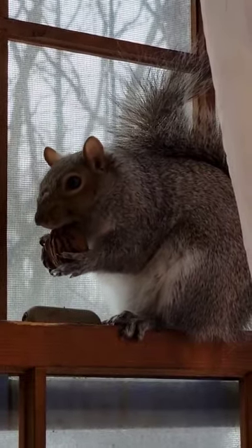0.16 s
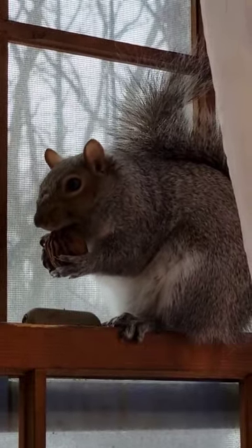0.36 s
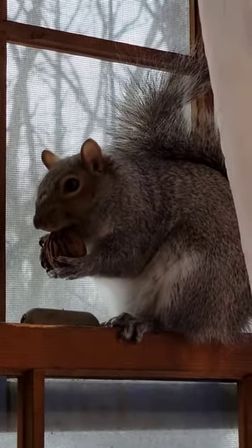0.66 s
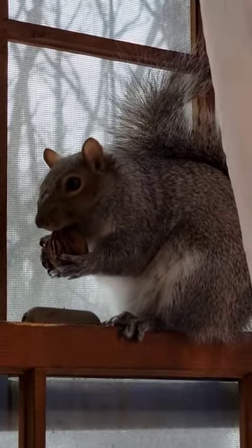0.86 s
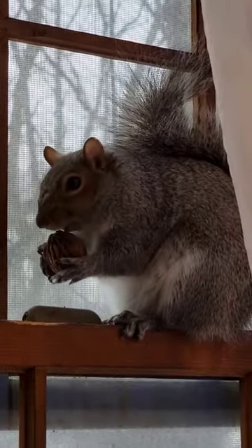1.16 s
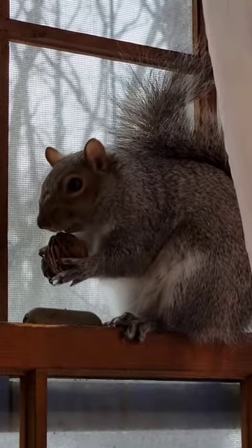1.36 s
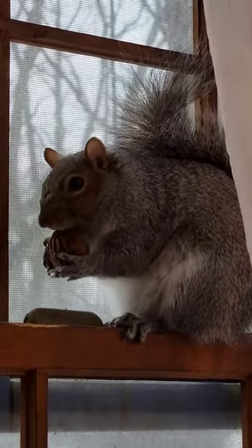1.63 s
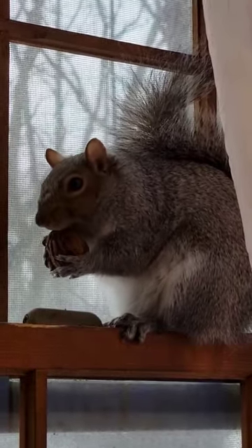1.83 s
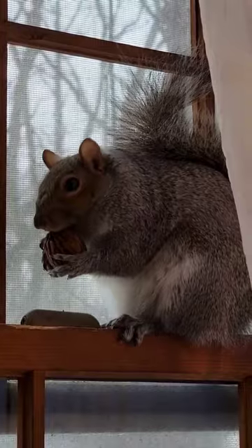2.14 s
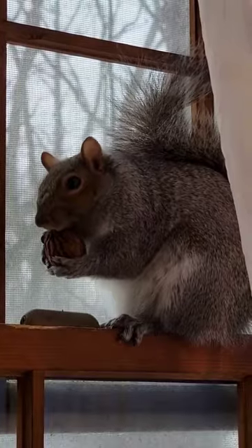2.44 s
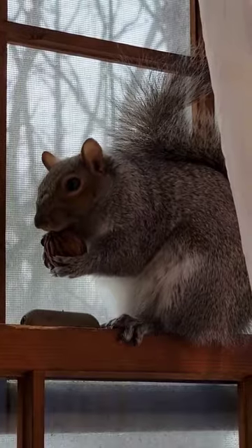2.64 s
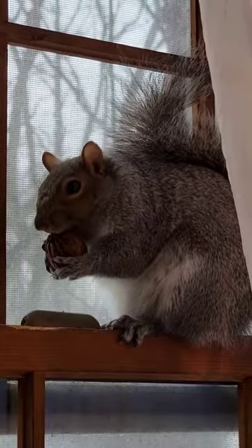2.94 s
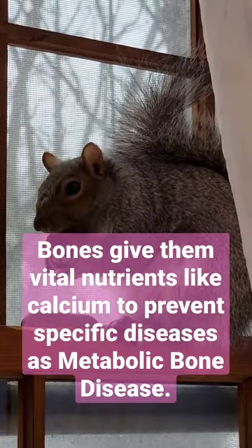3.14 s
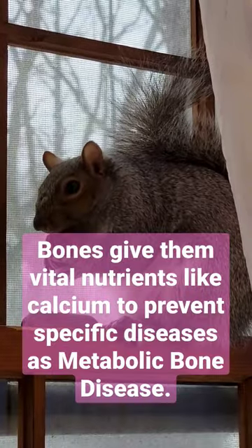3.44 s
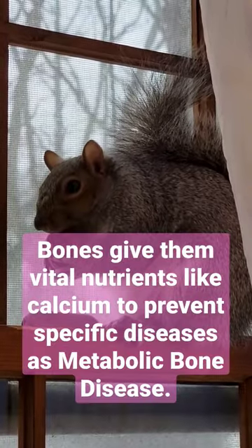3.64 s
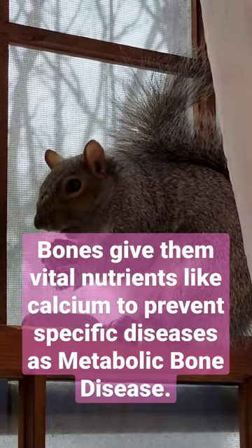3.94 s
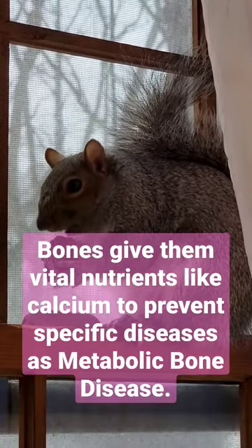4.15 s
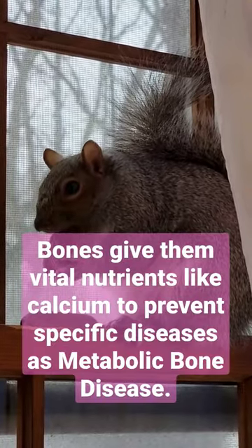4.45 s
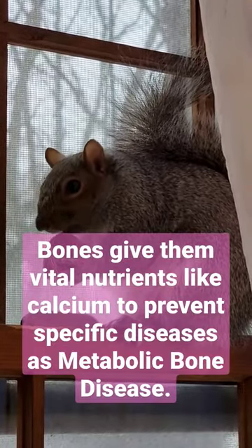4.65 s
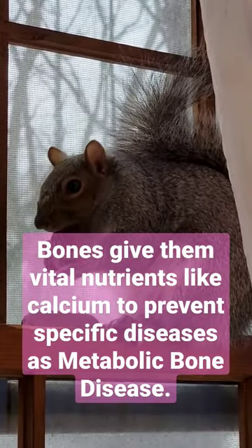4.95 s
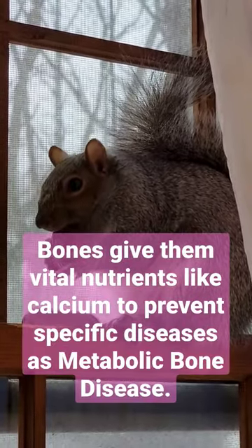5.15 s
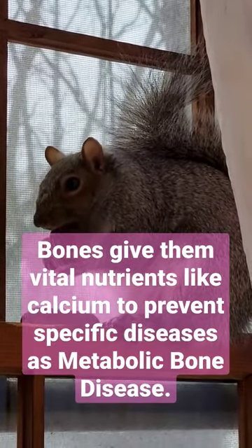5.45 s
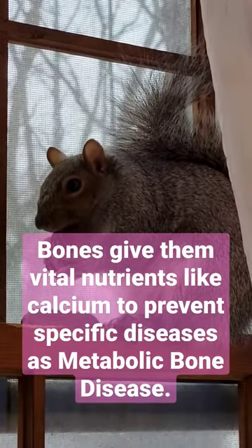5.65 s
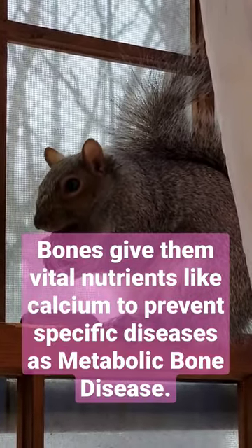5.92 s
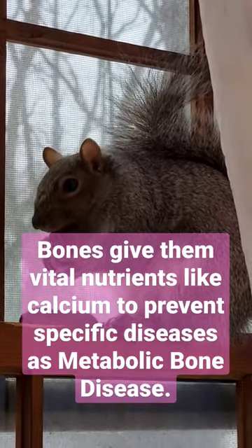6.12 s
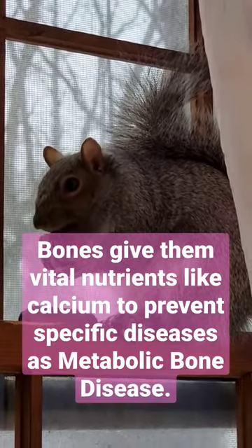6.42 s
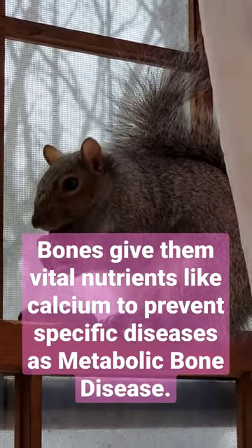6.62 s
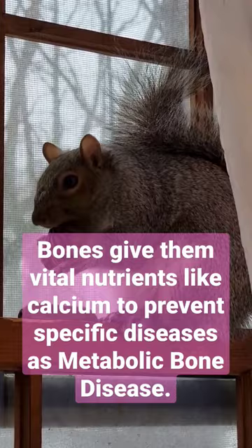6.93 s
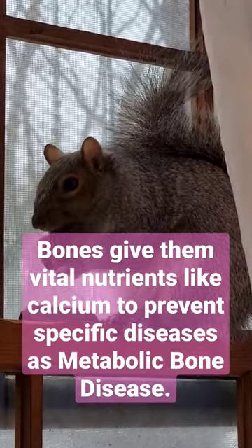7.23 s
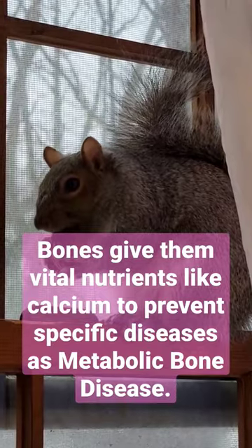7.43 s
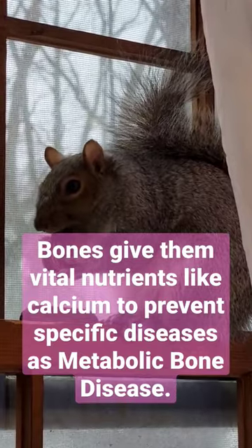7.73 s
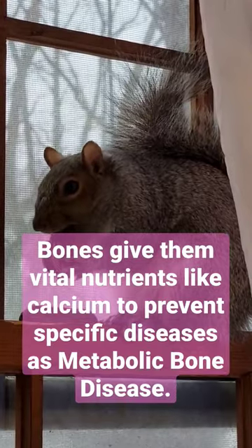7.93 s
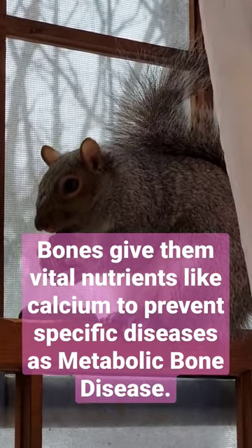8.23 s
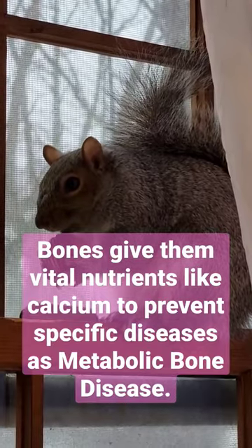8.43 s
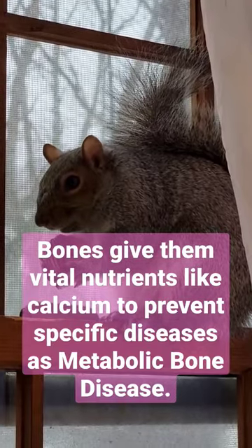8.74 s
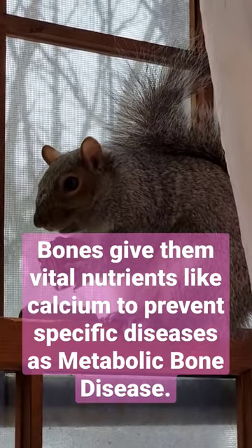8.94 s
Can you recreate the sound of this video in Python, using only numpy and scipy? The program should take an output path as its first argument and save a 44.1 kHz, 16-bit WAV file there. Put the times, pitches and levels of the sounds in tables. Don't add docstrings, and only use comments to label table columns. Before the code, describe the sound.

Tiny teeth drag over a nutshell in quick, gritty rasps, each swelling and cutting off in a fraction of a second. Quiet strokes come first, then a pause, a few isolated ticks, some hard snaps, another pause, and finally a long regular run of louder scraping. The shell rings woody and hollow with bright, scratchy edges. A close stereo microphone hears short reflections from the window corner and a soft, low house hum.

```python
import sys
import numpy as np
from scipy import signal
from scipy.fft import rfft, irfft, next_fast_len
from scipy.io import wavfile
from scipy.ndimage import uniform_filter1d

SR = 44100
rng = np.random.default_rng(int(sys.argv[2]) if len(sys.argv) > 2 else 0)


def linear_from_db(decibels):
    return 10 ** (np.asarray(decibels, float) / 20)


def wrap_up_sound(samples):
    columns = np.atleast_2d(samples).T
    tamed = np.clip(columns, -1, 1)
    steps = np.round(tamed * 32767).astype(np.int16)
    wavfile.write(sys.argv[1], SR, steps)


N = 400415


def unit(x):
    return x / np.sqrt(np.mean(x ** 2) + 1e-20)


def along(points, hz):
    f, v = np.transpose(points)
    return np.interp(np.log(hz + 1), np.log(f + 1), v)


def filtered(x, response):
    m = next_fast_len(N + SR // 2)
    return irfft(rfft(x, m) * response(np.fft.rfftfreq(m, 1 / SR)), m)[..., :N]


def resonances(modes, order=1):
    def response(f):
        total = 0
        for k, (pitch, width, db) in enumerate(modes):
            total = total + (-1) ** k * linear_from_db(db) * 1j * f * width / (pitch * pitch - f * f + 1j * f * width)
        return total ** order / np.sqrt(np.mean(abs(total) ** (2 * order)))
    return response


def leaning(points, hz):
    return linear_from_db(np.array([.5, -.5])[:, None] * along(points, hz))


# pitch_hz, likeness (-1 to 1)
HOUSE_ALIKE = [(60, 0.9), (130, 0.98), (290, 0.91), (640, 0.65), (1410, -0.15), (3100, -0.31), (6820, 0.15),
               (15000, -0.01)]
# pitch_hz, left_over_right_db
HOUSE_LEAN = [(60, 0), (110, -1.5), (200, -2), (380, -0.5), (700, -1.0), (1290, -1), (2380, -5), (4400, -8),
              (8120, 0.5), (15000, -3)]


def rush(colour, patchy_db):
    z = signal.stft(rng.standard_normal((2, N)), nperseg=512)[2]
    field = uniform_filter1d(rng.standard_normal(z.shape[1:]), size=6, axis=0)
    field = uniform_filter1d(field, size=14, axis=1)
    pair = signal.istft(z * linear_from_db(patchy_db * unit(field)), nperseg=512)[1][:, :N]

    def mid_side(hz):
        turn = np.arccos(np.clip(along(HOUSE_ALIKE, hz), -1, 1)) / 2
        return colour(hz) * np.array([np.cos(turn), np.sin(turn)])

    mid, side = filtered(pair, mid_side)
    ports = np.array([mid + side, mid - side])
    return unit(filtered(ports, lambda hz: leaning(HOUSE_LEAN, hz)))


# pitch_hz, level_db (per Hz)
HUM = [(20, -47), (32, -26), (58, -5.5), (213, -6.5), (350, -10), (390, -15.5), (800, -15), (880, -19),
       (1700, -21.5), (2750, -29.5), (4000, -28.5), (7000, -35), (7900, -42.5), (8300, -55)]
# pitch_hz, width_hz, level_db
DRONES = [(72.6, 35, 2.24), (157.3, 17, 3.4), (210.5, 16.7, 9.47), (275.5, 24.5, 5.9), (354.7, 17.4, 5.8),
          (2820, 690, 8)]
# pitch_hz, level_db (per Hz)
HISS = [(4880, -54), (8300, -9.5), (9880, -7.5), (11300, -4.5), (14600, -3.5), (15300, -7)]


def house():
    def hum_colour(hz):
        drones_db = sum(db * np.exp(-((hz - pitch) / width) ** 2) for pitch, width, db in DRONES)
        return linear_from_db(along(HUM, hz) + drones_db)

    hum = rush(hum_colour, patchy_db=1)
    hiss = rush(lambda hz: linear_from_db(along(HISS, hz)), patchy_db=0.8)
    return linear_from_db(-46) * hum + linear_from_db(-76) * hiss


# pitch_hz, t60_s
CORNER = [(1000, .13), (3000, .105), (7000, .075), (15000, .048)]


def corner(x):
    out, step = np.zeros((2, N + SR)), SR // 3
    delay = 60
    for start in range(0, N, step):
        hz, t, z = signal.stft(rng.standard_normal((2, SR // 4)), SR, nperseg=128)
        decay = linear_from_db(-60 * t / along(CORNER, hz)[:, None])
        tail = signal.istft(z * decay, SR, nperseg=128)[1]
        tail = tail / np.linalg.norm(tail[0])
        wet = signal.fftconvolve(x[None, start:start + step], tail, axes=1)
        out[:, start + delay:start + delay + wet.shape[1]] += wet
    return out[:, :N]


# full_bite_s, rise_s, hold_s,
# pressure_db, brightness_db
STROKES = [(0.071, 0.018, .002, -40.5, -3.5), (0.225, .02, .01, -38.5, -1), (0.392, 0.036, .005, -41, -8),
           (0.562, 0.028, 0.033, -39.5, -10.5), (0.789, 0.024, .002, -43, -3),
           (0.936, 0.029, .002, -39.5, -3.5), (1.117, 0.02, 0.0017, -42, -8), (2.047, .003, .012, -59, 7),
           (2.267, .01, .005, -59, -30), (2.519, 0.014, 0.0026, -46, 3), (2.668, 0.0026, 0.0093, -48, 1.5),
           (2.822, .004, 0.0097, -42.5, 3), (2.968, 0.025, 0.0033, -35.5, 2),
           (3.006, .006, 0.0034, -39.5, 3), (3.165, 0.036, 0.019, -31.5, -1),
           (3.375, 0.014, 0.0049, -41.5, 2.5), (3.534, 0.013, 0.015, -42, -6.5),
           (3.735, 0.07, .005, -47, -4), (3.758, 0.0073, 0.0034, -34, 1.5),
           (3.943, 0.025, .002, -41.5, -5.5), (4.524, .012, .005, -47, -16),
           (4.973, 0.015, .002, -33.5, -9), (5.128, 0.0034, .02, -40, -1.5),
        (5.154, 0.015, .006, -33.5, -11.5), (5.312, .034, .014, -29, -5.5),
        (5.484, 0.033, 0.024, -28.5, -7.5), (5.667, 0.027, .004, -28.5, -9.5),
        (5.826, 0.0066, .03, -40, -13.5), (5.864, .012, .006, -35, -13), (6.013, 0.021, .017, -39, -5.5),
        (6.201, 0.028, 0.027, -30.5, -5), (6.372, 0.0083, 0.032, -41, -11), (6.416, .006, 0.02, -36, -6.5),
        (6.606, 0.037, 0.011, -29.5, -7), (6.795, 0.051, .003, -40, -11.5),
        (6.956, 0.026, 0.025, -30, -9.5), (7.15, 0.049, .018, -33.5, -5.5),
        (7.332, 0.033, 0.029, -30.5, -8.5), (7.531, 0.03, 0.018, -32.5, -7),
        (7.727, 0.033, 0.027, -32.5, -10), (7.935, 0.043, .003, -31.5, -10),
        (8.125, 0.034, 0.012, -30.5, -11.5)]
# start_s, wall_db, kernel_db, enamel_db (over brightness)
GRIP = [
    (0, -15, -9.5, -3),
    (1.8, -23, -3.5, -10),
    (2.6, -11, -4.5, -7),
    (3.1, -12.5, -10, -1),
    (3.65, -8.5, -5, -1),
    (4.3, -22, -13.5, 1),
    (5.25, -12.5, -13, 6),
    (6.5, -7, -12.5, 3.5),
    (7.4, -8.5, -10, 3),
]


def jaw():
    rise_power, rasp_power = 1.56, 1
    release_s, release_grows = 0.028, 0.29
    trail_db, trail_s = -27, 0.11
    edge_rises_db_per_s, grit_rises_db_per_s, brighter_max_s = 124, 141, 0.074
    grip_scatter_db, travel_db, travel_hz = 1.5, 2.5, 45

    strokes, t = np.array(STROKES), np.arange(N) / SR
    which = np.clip(np.searchsorted(strokes[:, 0] - strokes[:, 1], t) - 1, 0, None)
    full_bite, rise, hold, pressure_db, bright_db = strokes[which].T
    closed = np.clip(1 + (t - full_bite) / rise, 1e-3, 1)
    after = np.maximum(t - full_bite - hold, 0)
    letting_go = linear_from_db(-30 * after / (release_s + release_grows * (rise + hold)))
    trail = linear_from_db(trail_db) * np.clip(1 - after / trail_s, 0, 1)
    force = linear_from_db(pressure_db) * closed ** rise_power * (letting_go + trail)

    slid = np.clip(t - full_bite, -brighter_max_s, brighter_max_s)
    grip = np.array(GRIP)
    wall_db, kernel_db, enamel_db = grip[np.searchsorted(grip[:, 0], full_bite) - 1, 1:].T
    scatter = grip_scatter_db * rng.standard_normal((len(strokes), 3))[which].T
    dome_db, wall_db, kernel_db = scatter + [0 * t, wall_db, kernel_db]
    edge_db = bright_db + edge_rises_db_per_s * slid
    grit_db = bright_db + enamel_db + grit_rises_db_per_s * slid

    knots = rng.standard_normal((5, int(N * travel_hz / SR) + 2))
    wander_db = [travel_db * np.interp(t * travel_hz, np.arange(len(row)), row) for row in knots]
    gains = linear_from_db(np.add([edge_db, grit_db, dome_db, wall_db, kernel_db], wander_db))
    gains[1] *= closed ** (rasp_power - rise_power)
    return force, gains


def slips(rate, spread_db, dust):
    sizes = linear_from_db(spread_db * np.minimum(rng.exponential(size=N), 3.5))
    ticks = (rng.random(N) < rate / SR) * sizes
    train = unit(ticks * np.sign(rng.standard_normal(N))) + dust * rng.standard_normal(N)
    return train / np.sqrt(abs(uniform_filter1d(train ** 2, size=700)) + 0.099)


# start_s, peak_db, brightness_db
SNAPS = [(0.2344, -30.5, 4.5), (0.415, -35.5, -6.5), (0.624, -44.5, 6), (0.7888, -40, 4.5),
         (0.937, -44, -20), (1.1218, -31.5, -27), (1.876, -43, -33), (2.054, -33, -6.5), (2.2606, -36, -43),
         (2.524, -41, -22), (2.667, -35, 2), (2.822, -30.5, 2), (2.9636, -48, -7), (2.9698, -34, -2),
         (2.9983, -25.5, -1), (3.1727, -34, -10), (3.1973, -23.5, -2), (3.377, -30, -4), (3.7296, -30, -4),
         (3.7503, -19, -2), (3.9464, -33, -24), (4.9752, -26.5, -25), (5.1226, -43.5, 2),
         (5.505, -32.5, 10), (5.5189, -19.5, -6), (5.662, -43, -23), (6.4174, -28.5, -4.5),
         (6.9533, -37, -28), (7.1476, -29, -8), (7.719, -27, -8.5)]
# pitch_hz, width_hz, level_db
HOLLOW = [(2270, 80, -8), (2555, 80, -8), (2720, 95, 0)]
# pitch_hz, width_hz, level_db
DOME = [(2955, 150, 0), (3190, 100, 1.5), (3490, 130, -4.5), (3905, 120, -7)]
# pitch_hz, width_hz, level_db
WALL = [(4755, 90, 1), (4400, 260, -3), (5000, 1100, -5)]
# pitch_hz, width_hz, level_db
KERNEL = [(1123, 133, 1), (1463, 62, 0), (1708, 43, 9), (1955, 590, 1.5)]
# pitch_hz, width_hz, level_db
EDGE = [(5090, 440, -18), (5770, 83, 11), (6380, 200, 11.5), (6480, 260, -5), (6616, 370, 3.5),
        (7574, 33, 5), (5500, 2400, -0.5)]
# pitch_hz, width_hz, level_db
GRIT = [(9680, 1330, 4.5), (13300, 490, 12), (15400, 970, 8)]
# pitch_hz, width_hz, level_db
CRACK = [(3250, 1500, 0)]


def gnawing():
    force, (edge_gain, grit_gain, dome_gain, wall_gain, kernel_gain) = jaw()
    rattle = slips(rate=480, spread_db=4.5, dust=.25)
    finer = .6 * rattle + .8 * slips(rate=1000, spread_db=4.5, dust=.3)
    deep = force * rattle * linear_from_db(-5.5)
    crack = deep * linear_from_db(-7.0)
    edge = force * finer * edge_gain * linear_from_db(-1.0)
    grit = force * finer * grit_gain * linear_from_db(-10.5)

    for start, peak_db, bright_db in SNAPS:
        here = round(start * SR) + 40
        crack[here] += linear_from_db(peak_db + 11)
        deep[here] += linear_from_db(peak_db + 8)
        tear = rng.standard_normal(32) * linear_from_db(-np.arange(32) * 1.5)
        tear = tear / np.linalg.norm(tear)
        edge[here:here + 32] += linear_from_db(peak_db + bright_db + 20.5) * tear
        grit[here:here + 32] += linear_from_db(peak_db + np.clip(bright_db, -24, -2) + 18.5) * tear

    second = force * slips(rate=600, spread_db=4, dust=.3)
    hollow = deep * linear_from_db(-5)
    dome = dome_gain * deep
    wall = wall_gain * (.6 * deep + .8 * second)
    kernel = kernel_gain * (.6 * deep + .8 * second)
    parts = (hollow, HOLLOW), (dome, DOME), (wall, WALL), (kernel, KERNEL), (edge, EDGE), (grit, GRIT)
    ringing = sum(filtered(drive, resonances(modes)) for drive, modes in parts)
    return ringing + filtered(crack, resonances(CRACK, order=2))


# pitch_hz, phase_rad
LEAD = [(0, 0), (1400, 4.1), (2300, 5), (3000, 6.3), (3700, 7.6), (4200, 8.7), (6400, 9.4), (9000, 12.2),
        (12100, 20.7), (16000, 28)]
# pitch_hz, left_over_right_db
LEAN = [(1000, -4), (2400, -1.5), (3000, -3.5), (4500, -8), (6400, -5.5), (8500, 1), (10500, 1),
        (12500, -0.5), (15000, 4)]
# pitch_hz, level_db
WET = [(1200, -2), (3000, -5), (4200, -1), (6000, -1.5), (12000, 2)]


def scene():
    def lead(hz):
        return np.exp(np.array([.5j, -.5j])[:, None] * np.interp(hz, *np.transpose(LEAD)))

    nut = gnawing()
    direct = filtered(np.array([nut, nut]), lead)
    answer = filtered(corner(nut), lambda hz: linear_from_db(along(WET, hz)))
    return filtered(direct + answer, lambda hz: leaning(LEAN, hz)) + house()


def starved(x, share, above_hz):
    hz, t, z = signal.stft(x, SR, nperseg=512)
    luck = rng.random((len(hz) // 3 + 1, len(t) // 8 + 1))
    luck = luck.repeat(3, axis=0).repeat(8, axis=1)[:len(hz), :len(t)]
    power = np.sum(abs(z[:, hz > 2000]) ** 2, axis=(0, 1))
    busy = abs(uniform_filter1d(power, size=17, origin=6))
    hunger = share * np.clip(np.log10(busy / np.percentile(busy, 20) + 1e-9), .1, 1)
    kept = (luck > hunger) | (hz[:, None] < above_hz)
    return signal.istft(z * kept, SR, nperseg=512)[1][:, :N]


def top_cut(x):
    return signal.sosfilt(signal.butter(12, 16630, fs=SR, output="sos"), x)


def record(dry):
    def notch_and_limit(hz):
        notch = 1 - .85 * np.exp(-((hz - 8250) / 150) ** 2)
        limit = linear_from_db(-np.interp(hz, [15450, 15550, 16000, 16600], [0, 16, 38, 55]))
        return notch * limit

    mix = starved(filtered(dry, notch_and_limit), share=.3, above_hz=7900)
    return top_cut(mix)


dry = scene()
out = record(dry)
wrap_up_sound(out)
```